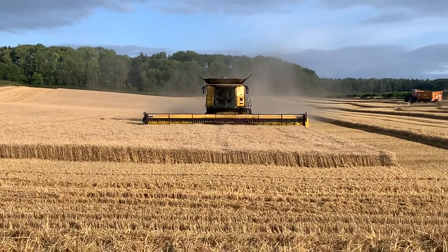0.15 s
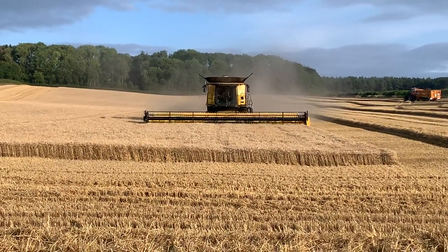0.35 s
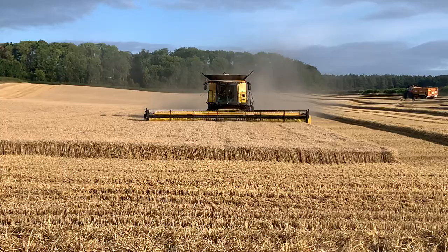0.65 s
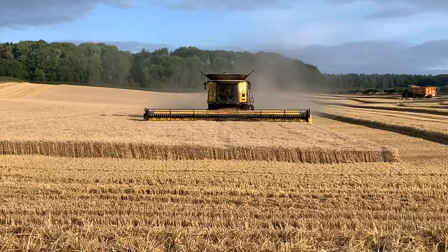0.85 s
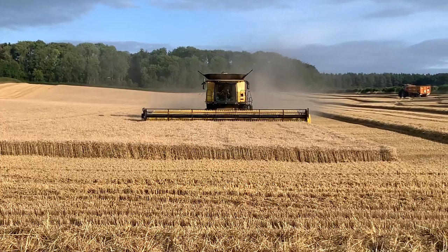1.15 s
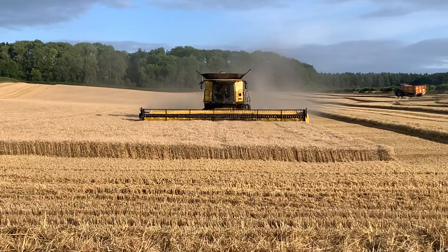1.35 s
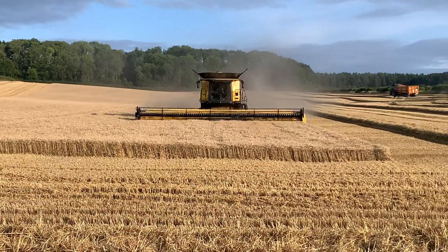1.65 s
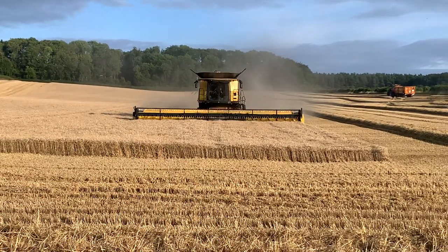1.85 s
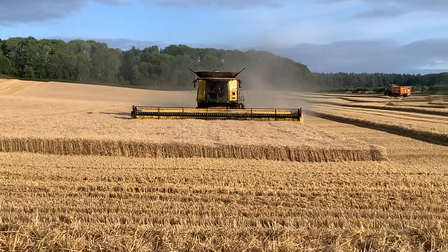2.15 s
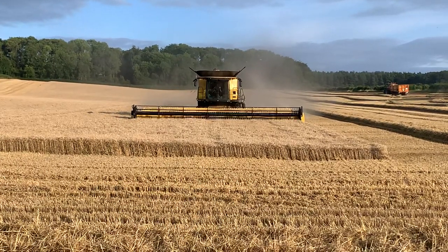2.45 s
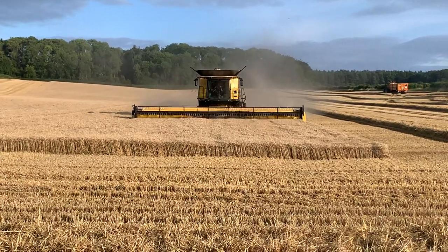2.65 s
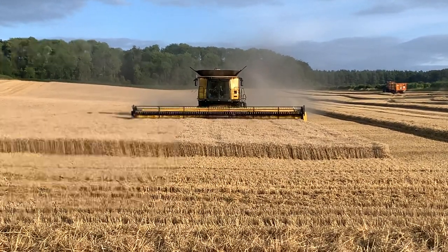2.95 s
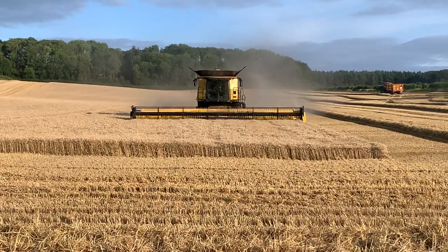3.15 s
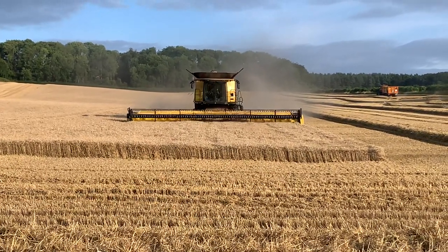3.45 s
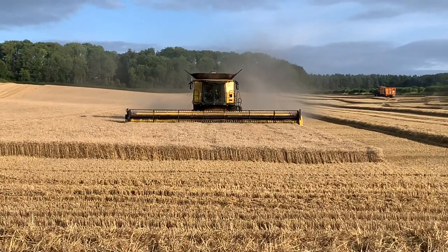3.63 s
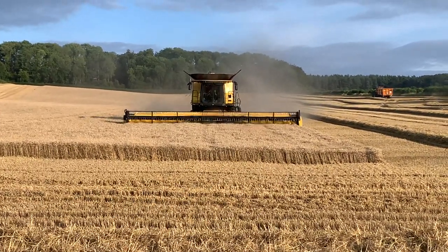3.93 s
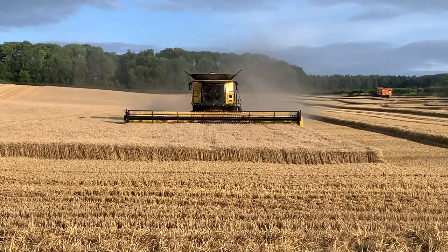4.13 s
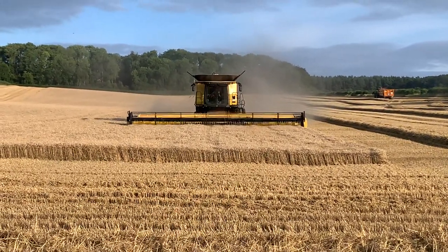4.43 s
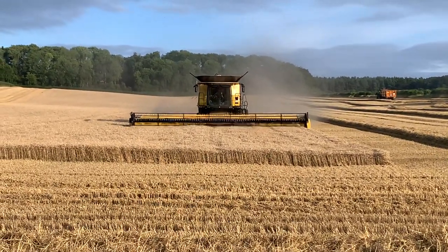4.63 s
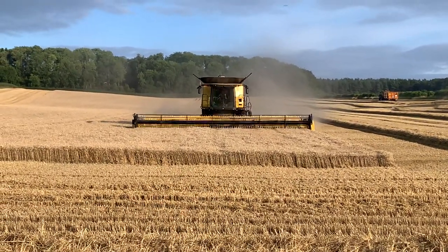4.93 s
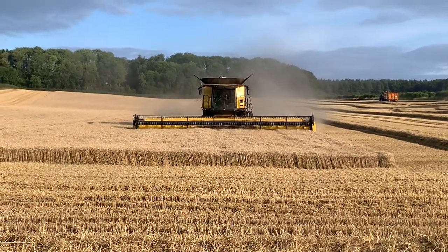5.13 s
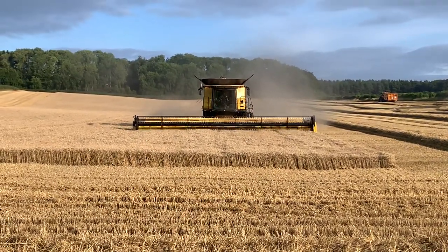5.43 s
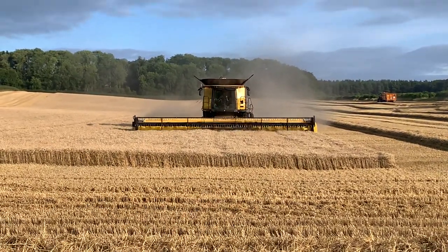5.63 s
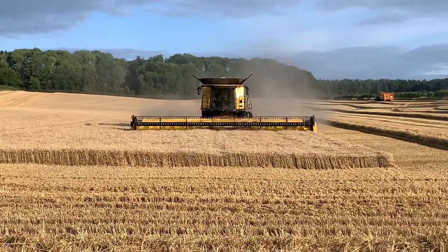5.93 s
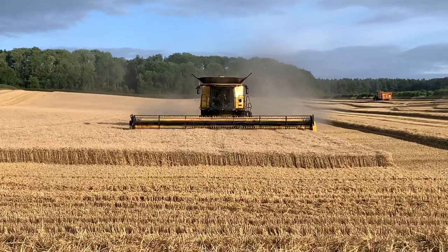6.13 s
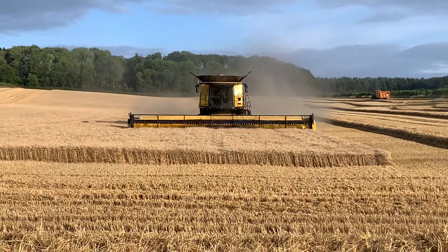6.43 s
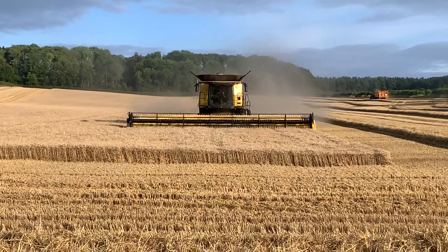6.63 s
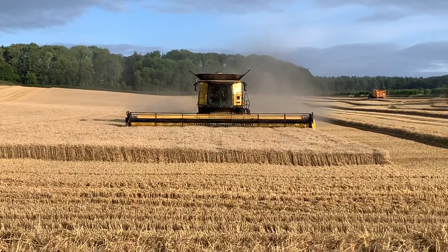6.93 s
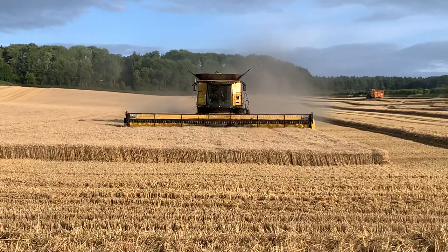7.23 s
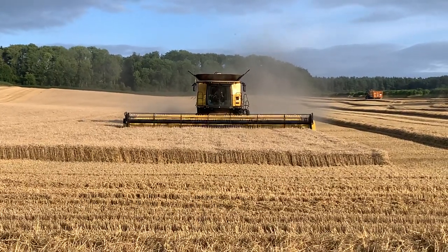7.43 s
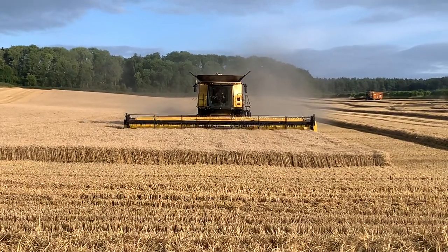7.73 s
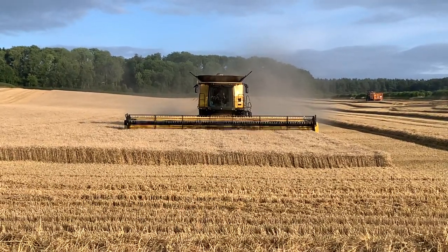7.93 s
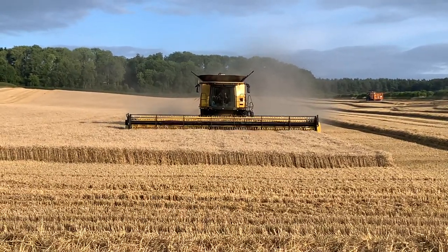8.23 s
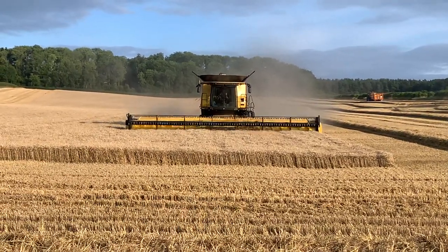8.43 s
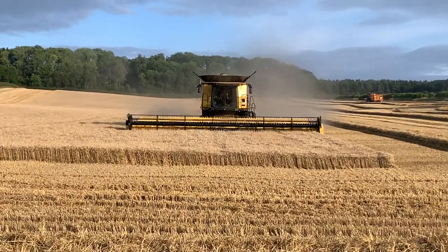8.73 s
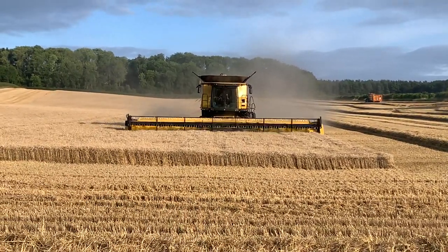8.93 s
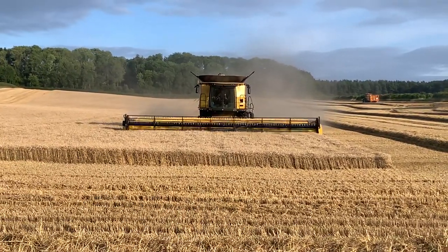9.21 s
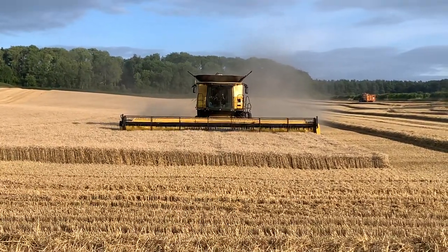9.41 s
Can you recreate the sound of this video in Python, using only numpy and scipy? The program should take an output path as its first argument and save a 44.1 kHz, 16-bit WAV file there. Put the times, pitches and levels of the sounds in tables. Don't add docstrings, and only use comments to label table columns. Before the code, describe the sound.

Deep, continuous harvester rumble with humming rotor and mid-pitched whine, rattling knife bar and flickering chaff hiss, growing slightly louder as it approaches outdoors.

```python
import sys
import numpy as np
from scipy import signal
from scipy.fft import rfft, irfft, next_fast_len
from scipy.io import wavfile
from scipy.ndimage import uniform_filter1d

SR = 44100
rng = np.random.default_rng(int(sys.argv[2]) if len(sys.argv) > 2 else 0)


def natural_amplitude(level_db):
    exponent = np.asarray(level_db, float) / 20
    return 10 ** exponent


def store_wav(level_fs):
    pcm = np.round(np.clip(np.atleast_2d(level_fs), -1, 1) * 32767)
    wavfile.write(sys.argv[1], SR, pcm.T.astype(np.int16))


N = 422017
PADDED = next_fast_len(N + 4096)
HZ = np.maximum(np.arange(PADDED // 2 + 1) * SR / PADDED, 1)

# pitch_hz, level_db
PORT_LEVEL = [(450, 0.23), (680, -10), (860, -.4), (1000, -5), (1200, -.4), (1500, -2.2), (2500, -.6),
              (4000, -5), (4400, -2.2), (5300, -9), (5700, -4), (5950, -7), (6500, -1.2), (7200, 0)]
# pitch_hz, lag_radians
PORT_LAG = [(40, .07), (110, .2), (190, .14), (500, .5), (640, .48), (760, -.5), (900, 0), (1100, -.35),
            (1700, .1), (1950, -.6), (2200, -.1), (2450, -1.8), (2620, .5), (3000, -1.2), (3450, -1.5),
            (3800, -.6), (4100, -1.5), (4450, -.6), (4600, -1.8), (5000, -1.2), (5300, -2.4), (5550, -1.8),
            (5750, 1), (6050, 0)]
# pitch_hz, likeness_0_to_1
PORT_LIKENESS = [(40, 0.96), (150, 0.94), (400, 1), (1500, 0.89), (2500, 0.88), (5000, 0.8), (8000, 0.98),
                 (13000, 0.79)]
GROUND_NOTCHES = [400, 900, 1280, 1800, 2450, 3000, 3470, 3950, 4500, 5150, 5850, 6400, 7000, 7500, 8100,
                  8700, 9300]
# time_s, share_0_to_1
CHAFF_ECHO = [(0, 0.5), (1.0, 0.5), (2.0, 0.6), (3.7, 0.7), (4.5, 0.4), (6.0, 0.13), (9.57, 0.3)]
# time_s, level_db
BREEZE = [(0, 2), (.5, 3), (1.0, 3), (1.6, 2.5), (2.0, 2.5), (2.5, 1), (3.4, -0.5), (4.6, 0), (5.7, -2),
          (6.3, 0.7), (6.8, 1.5), (7.3, 1.2), (8.2, 3), (8.8, 2), (9.3, 0.5), (9.57, 0)]
# time_s, pitch_hz
DRIVE_SPEED = [(0, 635.0), (1.6, 636.3), (3.2, 633.5), (3.9, 635.5), (4.5, 635.7), (5.0, 631.7),
               (5.9, 633.2), (6.4, 637.0), (6.95, 635.3), (7.6, 636.5), (8.25, 633.3), (9.1, 636.2),
               (9.57, 636.8)]
# time_s, level_db
GEAR_STRAIN = [(0, 1.5), (.5, -1), (1.7, 1.5), (2.3, -1), (3.15, -4.5), (3.6, -4.5), (4.0, 0), (4.15, -10),
               (4.5, -0.5), (4.9, -5), (5.5, -0.5), (6.2, -1.5), (6.6, 2.5), (7.1, -0.5), (7.7, 4.5),
               (7.85, 2), (8.0, -2), (8.7, -2.5), (8.95, -0.5), (9.3, 4), (9.57, 5)]
# time_s, level_db
OIL_PRESSURE = [(0, 4), (.4, -1.5), (2.4, 0), (3.3, -8), (4.5, 0), (5.0, -9), (6.1, -5), (6.4, 0),
                (7.8, 3.5), (7.95, -3), (8.8, -3), (8.95, 6.5), (9.57, -7)]
# time_s, level_db
HOUSING_BOOM = [(0, -72), (3.0, -52), (6.0, -52.5), (9.57, -45)]
# pitch_hz, level_db_per_hz
STUBBLE_COLOUR = [(600, -2), (1000, 4), (1800, -2), (2500, -3), (3300, -4), (4500, -4), (6000, -18),
                  (7600, -14), (8200, -30)]
# pitch_hz, level_db_per_hz
RUMBLE_COLOUR = [(18, -48), (30, -34), (50, -5.5), (65, -6), (90, 0), (140, -2.5), (180, -5.5), (235, -11),
                 (270, -23), (330, -30), (450, -54)]
# pitch_hz, level_db_per_hz
ROAR_COLOUR = [(200, -32), (330, -11.5), (480, 1.5), (640, -0.5), (800, -0.5), (1050, -6), (1300, -8),
               (1700, -23), (2200, -20.5), (2600, -55)]
# pitch_hz, level_db_per_hz
DUST_COLOUR = [(6000, -5), (7500, -4.5), (9000, 0), (10200, -3.5), (11000, -13), (12500, -13),
               (13600, -12.5), (14400, -27), (15500, -30)]
# pitch_hz, level_db_per_hz
CHAFF_COLOUR = [(1500, 3), (2300, -3.5), (3200, -3), (4200, 1.5), (4600, 0.5), (5350, 5.5), (6000, -2),
                (6800, -2.5), (7500, -9), (9000, -15)]
# pitch_hz, level_db_per_hz
CLATTER_COLOUR = [(900, -38), (1300, 6.5), (1500, -1), (1700, -4), (2000, -2.5), (2250, -35), (2450, -20),
                  (4000, -19.5)]
# pitch_hz, level_db, swell_db
SHAFT_LINES = [(34.0, -52, 2.1), (47.1, -46, 2.1), (64.3, -40, 2.1), (68.0, -39, 2.1), (72.2, -39, 2.1),
               (75.0, -37, 2.1), (89.5, -42, 3), (94.5, -42, 3), (107.0, -42, 3), (150.0, -43, 3),
               (160.7, -43, 3), (189.3, -42.5, 2.5), (283.8, -61, 2.1), (439, -64, 3), (805.0, -65, 3),
               (1156.5, -65, 3), (2056.0, -68, 3)]
# time_s, swell_db
SIEVE_LOADS = [(.45, 0), (1.15, -4), (1.75, 0.5), (2.45, 1.5), (2.75, 1), (3.4, -1), (3.9, 1.5), (4.6, 2),
               (5.3, 1.5), (5.95, -3), (6.65, 3), (7.2, 0.5), (7.8, -1), (8.4, -2), (8.85, 2.5), (9.3, 1)]
# time_s, swell_db
CROP_WADS = [(.55, 6), (.9, 7), (1.1, 8), (1.73, 7), (1.98, 9), (2.2, -9), (2.46, 8), (2.66, 5.5), (2.9, 1),
             (3.1, 0.5), (3.57, 8.5), (3.8, 9.5), (4.15, -7), (4.6, 6.5), (4.9, 7), (5.6, 6), (5.88, 3.5),
             (6.11, 11.5), (6.45, 10.5), (7.4, 6), (7.65, 6.5), (7.92, 6), (8.3, 9.5), (8.6, 6.5),
             (8.8, 5.5), (9.12, 3), (9.36, 1)]
# time_s, swell_db
STRAW_CLUMPS = [(.02, 5), (.73, 3), (1.12, 4.5), (1.84, 3.5), (2.62, 3), (3.02, 4.5), (3.16, 3), (3.69, 5),
                (4.02, 4), (4.39, 3), (4.56, 2), (4.93, 3), (5.36, 2), (6.63, 4), (6.97, 6), (7.28, 4.5),
                (7.67, 2), (8.39, 2.5), (8.98, 2.5), (9.14, 2.5), (9.25, 2)]
# start_s, peak_db
HOUSING_KNOCKS = [
    (1.857, -20.5),
    (1.9835, -24),
    (2.553, -29),
]
# pitch_hz, level_db, ring_s (time to fall 60 dB)
BAR_MODES = [(1500, 5, 0.014), (1490, 4, 0.064), (1554, 12, 0.039), (1620, -9.5, 0.12), (1650, -2, 0.089),
             (1876, 2.5, 0.05), (2080, -3.5, 0.053), (2174, -7.5, 0.058)]
# start_s, peak_db, pitch_hz
KNIFE_HITS = [(3.0937, -24.5, 1490), (4.0164, -25.5, 1550), (4.385, -22.5, 1554), (4.5521, -24, 1530),
              (6.623, -18, 1530), (6.984, -22, 1540), (8.5678, -25.5, 1980), (0.051, -25, 1525),
              (1.159, -32, 1530), (1.706, -27, 1590), (2.6065, -31, 1550), (5.3307, -25, 1600),
              (6.7396, -28, 1500), (7.1754, -19.5, 1570), (7.5136, -24, 1580), (7.665, -25, 1550),
              (7.8334, -27, 1580), (8.0367, -29, 1550), (8.3684, -31, 1560), (8.88, -24, 1500),
              (8.973, -29, 1560), (9.2444, -25, 1560)]

LOAD_S, WAD_S, CLUMP_S = 0.098, 0.055, 0.036
# level_db, nearing_db_per_s, breeze_share
SCATTER_LAW, RUMBLE_LAW, ROAR_LAW = (-57, 0.1, 0.8), (-27, 0.28, 0.01), (-45, 0.21, 0.38)
DUST_LAW, CHAFF_LAW, KNIFE_LAW = (-65, 0.45, 1.6), (-53, 0.01, 1.28), (-44, 0.43, 0.54)
FAN_LAW, PUMP_LAW, CHOPPER_LAW = (-59, 0.93, 0.01), (-54.5, 0.36, 1), (-53.5, 1, 0.01)
ROTOR_LAW, GEAR_LAW = (-33, 0.35, 0.01), (-42.5, 0.01, 0.01)


def rms_one(x):
    return x / np.sqrt(np.mean(x ** 2) + 1e-20)


def in_time(rows):
    s, value = np.transpose(rows)
    return np.interp(np.arange(N) / SR, s, value)


def at_hz(points):
    hz, value = np.transpose(points)
    return np.interp(np.log(HZ), np.log(hz), value)


def seconds_from_middle():
    return (np.arange(N) - N / 2) / SR


def heard(law):
    level_db, nearing_db_per_s, breeze_share = law
    return level_db + nearing_db_per_s * seconds_from_middle() + breeze_share * in_time(BREEZE)


def drift(rate_hz):
    r = np.exp(-80 * np.pi * rate_hz / SR)
    steps = rng.standard_normal(N // 40 + 2002)
    slow = signal.lfilter([1], [1, -2 * r, r * r], steps)[2000:]
    return np.interp(np.arange(N) / 40, np.arange(len(slow)), rms_one(slow))


def swells(rows, width_s):
    t = np.arange(0, N + 40, 40) / SR
    total_db = np.zeros(len(t))
    for s, db in rows:
        late = t - s + width_s / 4
        side_s = width_s * np.where(late < 0, 2 / 3, 4 / 3)
        total_db += db * np.exp(-(late / side_s) ** 2)
    return np.interp(np.arange(N) / SR, t, total_db)


def tone(hz, level_db):
    cycles = np.cumsum(hz) / SR + rng.random()
    return np.sqrt(2) * natural_amplitude(level_db) * np.sin(2 * np.pi * cycles)


def ring(clicks, hz, t60_s):
    r, w = natural_amplitude(-60 / (t60_s * SR)), 2 * np.pi * hz / SR
    return signal.lfilter([0, np.sin(w)], [1, -2 * r * np.cos(w), r * r], clicks + 1e-18)


def shaken(hz, t60_s):
    return rms_one(ring(rng.standard_normal(N), hz, t60_s))


def noise(colour, air, shared_db, own_db, count):
    low_hz, high_hz = colour[0][0], colour[-1][0]
    common, other = rfft(rng.standard_normal((2, PADDED)))
    alike = np.clip(at_hz(PORT_LIKENESS), 0, 1)
    left = alike * common + np.sqrt(1 - alike ** 2) * other
    pair = np.array([left, common]) * natural_amplitude(at_hz(colour))
    pair *= (HZ > low_hz) & (HZ < high_hz)
    place = np.log(HZ / low_hz) / np.log(high_hz / low_hz) * (count - 1)
    out = 0
    for k in range(count):
        band = irfft(pair * np.clip(1 - abs(place - k), 0, 1), PADDED)[:, :N]
        out = out + band * natural_amplitude(shared_db * air + own_db * drift(15.0))
    return rms_one(out)


def bounce(x, share, dull_hz):
    turns = np.interp(HZ, GROUND_NOTCHES, np.arange(len(GROUND_NOTCHES)))
    path = -np.exp(-2j * np.pi * turns) * (HZ > GROUND_NOTCHES[0])
    path = path / np.sqrt(1 + (HZ / dull_hz) ** 6)
    late = irfft(rfft(x, PADDED) * path, PADDED)[..., :N]
    return (x + share * late) / np.sqrt(1 + share ** 2)


def scatter():
    inside = (HZ > STUBBLE_COLOUR[0][0]) & (HZ < STUBBLE_COLOUR[-1][0])
    spectrum = rfft(rng.standard_normal((2, PADDED))) * natural_amplitude(at_hz(STUBBLE_COLOUR)) * inside
    return natural_amplitude(heard(SCATTER_LAW)) * rms_one(irfft(spectrum, PADDED)[:, :N])


def rumble(air):
    level_db = heard(RUMBLE_LAW) - 0.7 + swells(SIEVE_LOADS, LOAD_S)
    return natural_amplitude(level_db) * noise(RUMBLE_COLOUR, air, shared_db=0.4, own_db=0.2, count=3)


def roar(air):
    return natural_amplitude(heard(ROAR_LAW) + 6.0) * noise(ROAR_COLOUR, air, shared_db=1.0, own_db=1.14, count=4)


def housing():
    return natural_amplitude(in_time(HOUSING_BOOM)) * shaken(410, 0.0089)


def knocks():
    out, t = np.zeros(N), np.arange(400) / SR
    thud = np.exp(-((t - 0.0032) / 0.0011) ** 2) * np.sin(2 * np.pi * 560 * (t - 0.0028))
    for s, db in HOUSING_KNOCKS:
        at = round(s * SR)
        out[at:at + len(t)] += natural_amplitude(db) * thud
    return out


def shafts():
    nearer_db = np.linspace(-1.1, 1.1, N)
    out = np.zeros(N)
    for hz, db, swell_db in SHAFT_LINES:
        pitch_hz = hz * (1 + 0.00145 * drift(0.74))
        out += tone(pitch_hz, db - 0.5 + nearer_db + swell_db * drift(1.0))
    return out


def rotor(mesh_hz):
    rotor_db = heard(ROTOR_LAW)
    drone = tone(0.22724 * mesh_hz, rotor_db + swells(CROP_WADS, WAD_S))
    cage = natural_amplitude(rotor_db - 10.5) * shaken(141.1, 0.25)
    sieve = natural_amplitude(rotor_db - 5.5 + swells(SIEVE_LOADS, LOAD_S)) * shaken(72.7, 0.37)
    return drone + cage + sieve


def fan(mesh_hz):
    return tone(0.633 * mesh_hz, heard(FAN_LAW) + 2.1 * drift(2.5))


def chopper(mesh_hz):
    beat = 1 + 0.49 * np.cos(2 * np.pi * 0.97 * (np.arange(N) / SR - 8.17))
    return beat * tone(0.4617 * mesh_hz, heard(CHOPPER_LAW))


def pump(mesh_hz):
    level_db = heard(PUMP_LAW) + 0.3 * in_time(GEAR_STRAIN) + in_time(OIL_PRESSURE)
    return tone(2.2 * mesh_hz, level_db)


def gear(mesh_hz):
    shaft_hz = 22.74
    wobble = 1 + 0.36 * np.sin(2 * np.pi * shaft_hz * np.arange(N) / SR)
    return wobble * tone(mesh_hz, heard(GEAR_LAW) + in_time(GEAR_STRAIN) + 0.72 * drift(12.0))


def whines():
    mesh_hz = uniform_filter1d(in_time(DRIVE_SPEED), SR // 4)
    return rotor(mesh_hz) + fan(mesh_hz) + chopper(mesh_hz) + pump(mesh_hz) + gear(mesh_hz)


def dust(air):
    return natural_amplitude(heard(DUST_LAW) + 6.5) * noise(DUST_COLOUR, air, shared_db=1.5, own_db=0.95, count=3)


def chaff(air):
    level_db = heard(CHAFF_LAW) + 4.0 + 0.21 * swells(STRAW_CLUMPS, CLUMP_S)
    hiss = natural_amplitude(level_db) * noise(CHAFF_COLOUR, air, shared_db=1.15, own_db=1.14, count=5)
    dull = irfft(rfft(hiss, PADDED) / (1 + (HZ / 2550) ** 8), PADDED)[:, :N]
    return hiss + dull * (natural_amplitude(1.1 * seconds_from_middle()) - 1)


def knife_level():
    t = np.arange(N) / SR - 4.03
    strokes = np.cos(2 * np.pi * 5.49 * t) + np.cos(2 * np.pi * 5.752 * t)
    return heard(KNIFE_LAW) + 0.4 * strokes + 0.6 * drift(5.4) + swells(STRAW_CLUMPS, CLUMP_S)


def clatter(knife_db, air):
    return natural_amplitude(knife_db - 2.0) * noise(CLATTER_COLOUR, air, shared_db=0.5, own_db=1.0, count=3)


def rattle(knife_db):
    ticks_per_s, damping = 900, 0.6
    strength = natural_amplitude(1.2 * np.minimum(rng.exponential(1, N), 4))
    ticks = (rng.random(N) < ticks_per_s / SR) * strength
    dealt = rng.integers(0, len(BAR_MODES), N)
    out = np.zeros(N)
    for k, (hz, db, t60_s) in enumerate(BAR_MODES):
        out += natural_amplitude(db) * ring(ticks * (dealt == k), hz, damping * t60_s)
    return natural_amplitude(knife_db - 6.0) * rms_one(out)


def clanks():
    out, t = np.zeros(N), np.arange(3000) / SR
    edge = signal.butter(2, (1790, 2260), "band", fs=SR, output="sos")
    for s, db, hz in KNIFE_HITS:
        burst = rng.standard_normal(len(t))
        low_mode = natural_amplitude(-60 * t / 0.03) * np.sin(2 * np.pi * hz * t)
        high_mode = 0.4 * natural_amplitude(-60 * t / 0.008) * np.sin(2.6 * np.pi * hz * t)
        hit = signal.fftconvolve(burst * np.exp(-t / 0.0062), low_mode + high_mode)[:len(t)]
        crack = signal.sosfilt(edge, burst * np.exp(-t / 0.0084))
        both = hit / abs(hit).max() + natural_amplitude(-8.5) * crack / abs(crack).max()
        at = round(s * SR)
        out[at:at + len(t)] += natural_amplitude(db - 6.5) * both
    return out


def scene():
    air = 0.04 * drift(1.9) + 0.52 * drift(28.0)
    knife_db = knife_level()
    middle = bounce(roar(air) + clatter(knife_db, air), 0.63, dull_hz=2490)
    treble = bounce(chaff(air), np.clip(in_time(CHAFF_ECHO), 0, 1), dull_hz=5400)
    body = rumble(air) + housing() + knocks()
    steel = rattle(knife_db) + clanks()
    return scatter() + body + shafts() + whines() + dust(air) + middle + treble + steel


def band_limit(x):
    return signal.sosfilt(signal.butter(12, 15150, fs=SR, output="sos"), x)


def record(dry):
    around_s = 1 / 4700
    lag = at_hz(PORT_LAG) + 2 * np.pi * np.maximum(HZ - 6250, 0) * around_s
    shading = natural_amplitude(at_hz(PORT_LEVEL)) * np.exp(-1j * lag)
    left = irfft(rfft(dry[0], PADDED) * shading, PADDED)[:N]
    return band_limit(np.array([left, dry[1]]))


dry = scene()
out = record(dry)
store_wav(out)
```